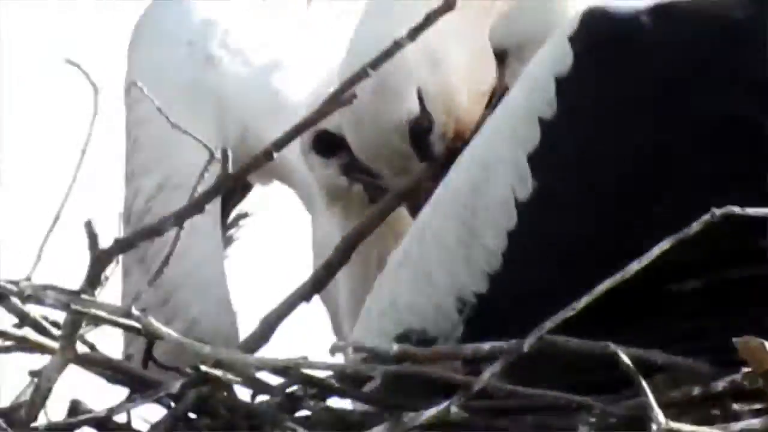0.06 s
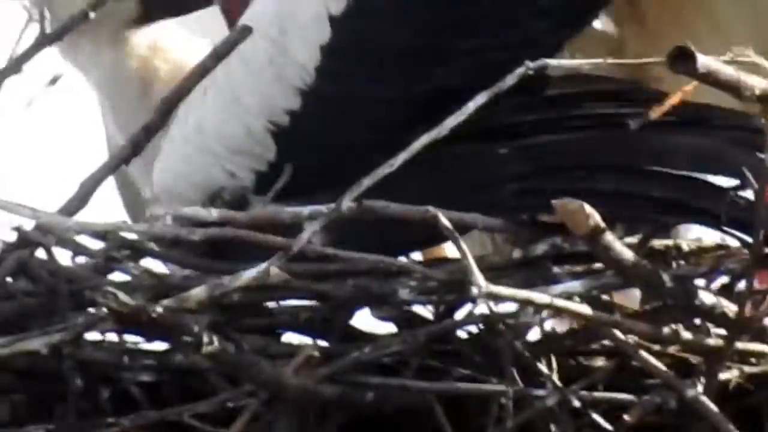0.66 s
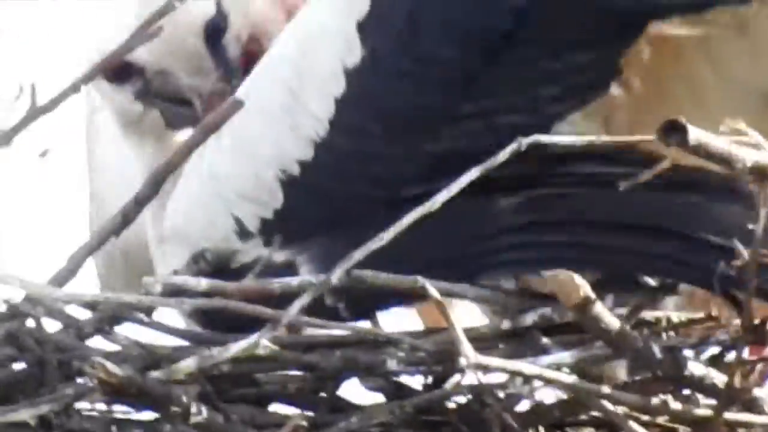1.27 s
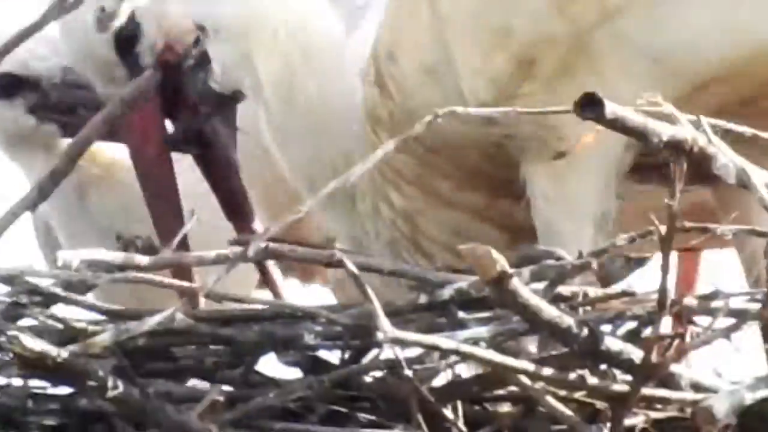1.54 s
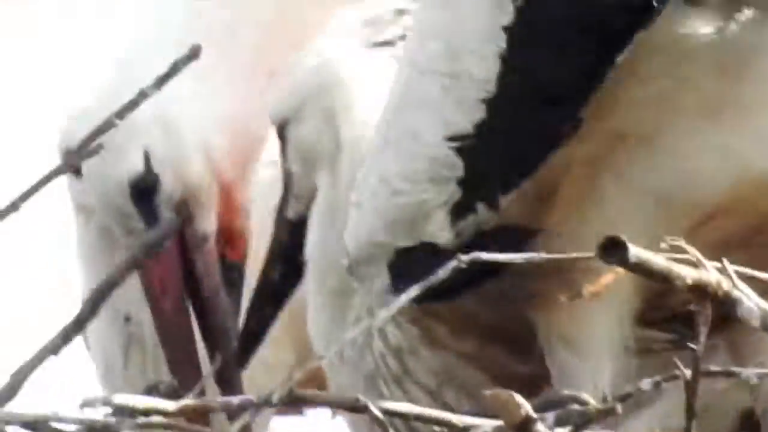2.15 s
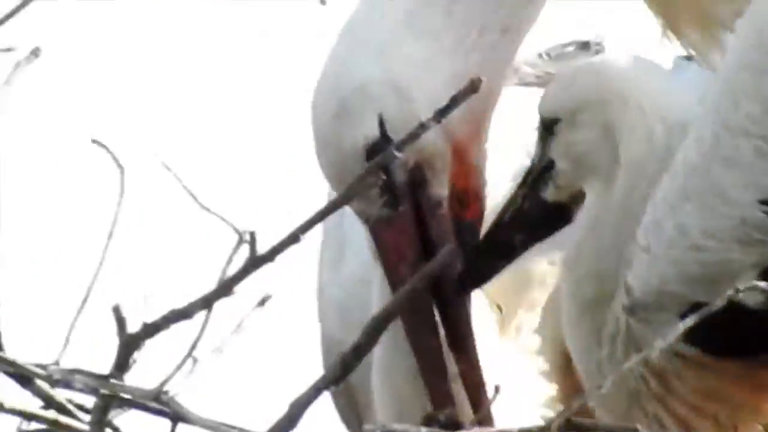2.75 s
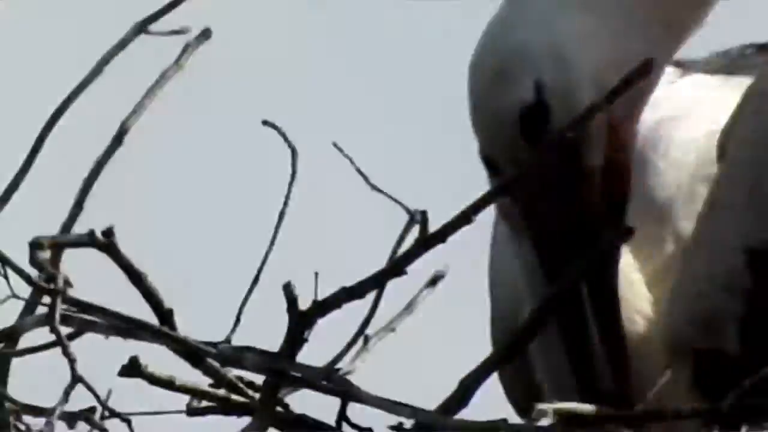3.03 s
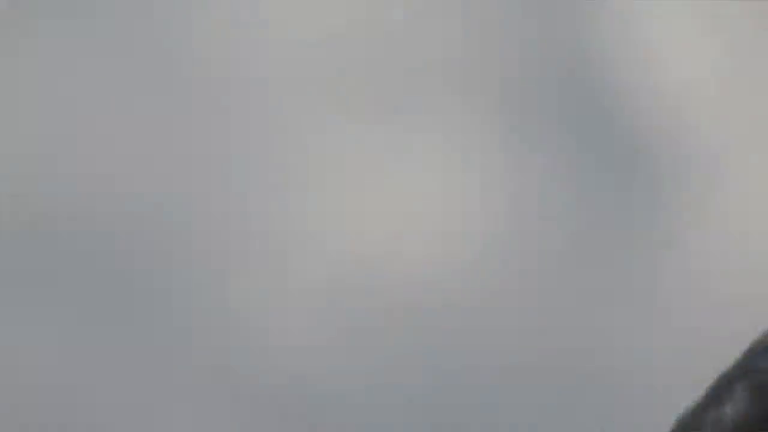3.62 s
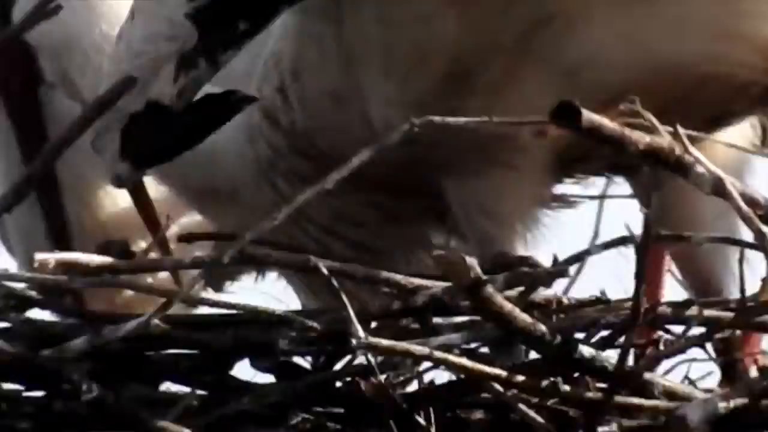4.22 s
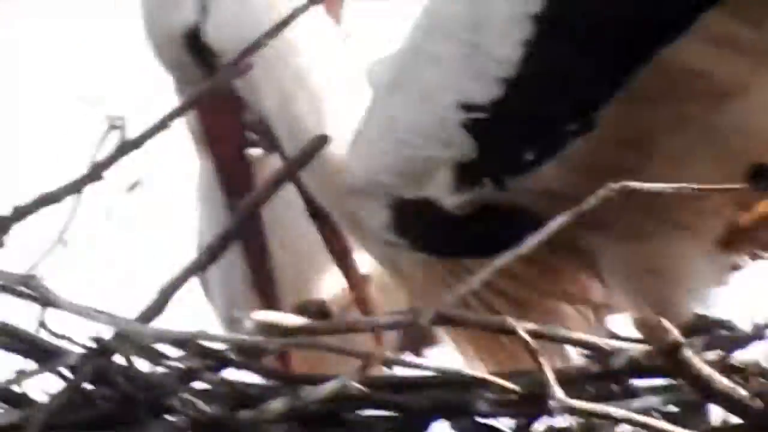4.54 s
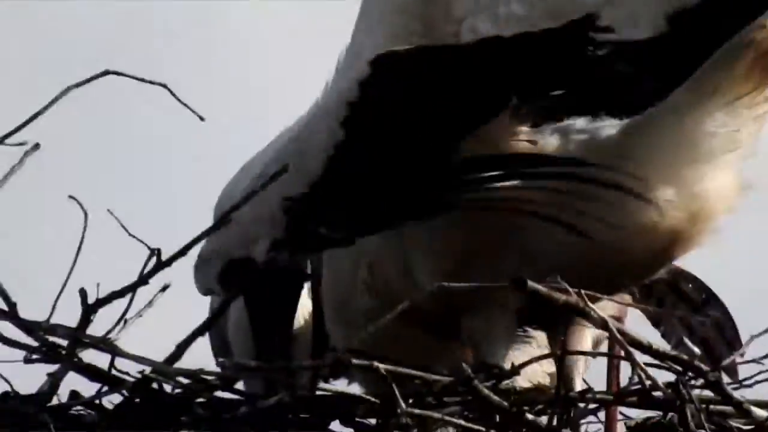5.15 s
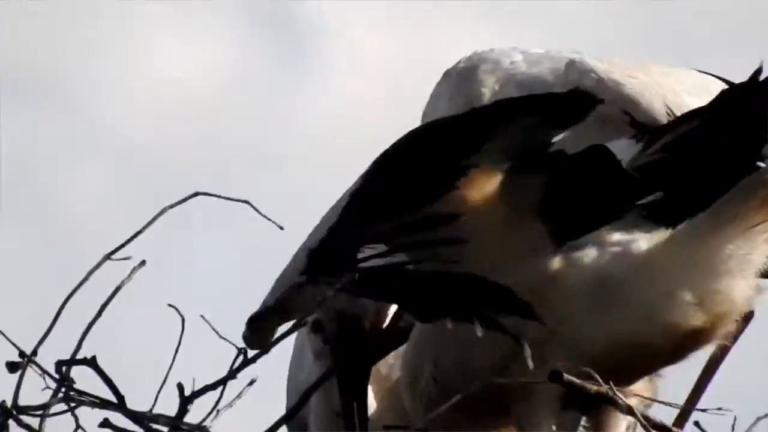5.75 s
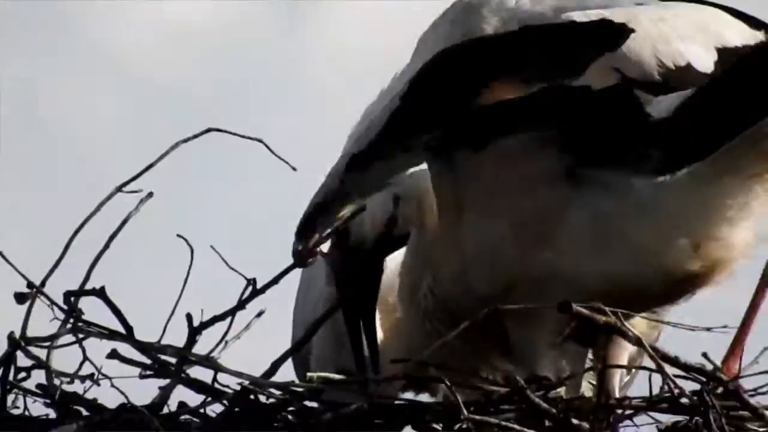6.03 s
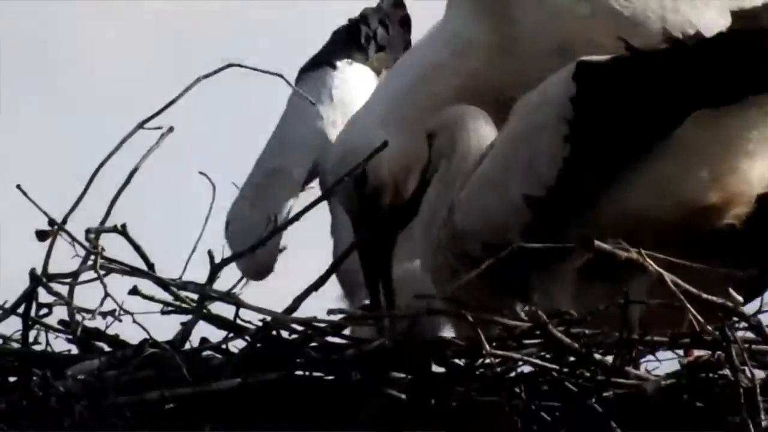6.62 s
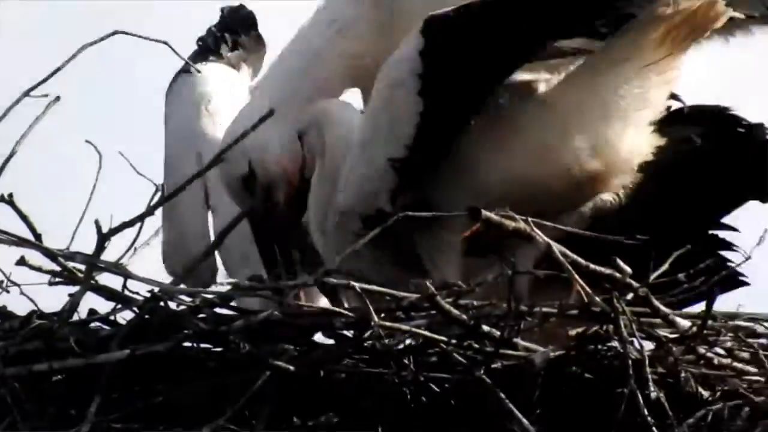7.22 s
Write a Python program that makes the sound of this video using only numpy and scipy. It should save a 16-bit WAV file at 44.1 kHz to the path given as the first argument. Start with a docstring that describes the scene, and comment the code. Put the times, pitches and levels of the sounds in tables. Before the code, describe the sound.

Outdoors, wind rumbles and bumps irregularly on the microphone over a low distant drone and a high, steady hiss. A small bird repeats a faint falling whistle about once a second throughout. Three thin, high pips sound between 0.5 and 0.9 seconds. At 0.9 seconds comes a loud wooden thud with a rebound, a hollow rattle and a rustle of nest twigs. A softer thud at 2.3 seconds brings another rustle and a brief hoarse squeal. A few dry stick knocks follow from about 4.5 seconds, ending with a sharp snap at 5.4. At 6 seconds a cow begins one moo, climbing in a thin high voice, cracking at 6.3 and dropping into a loud, steady, brassy bellow. It sits slightly left with a short yard echo, turns raspy near 7 seconds and carries on to the end, around 7.3 seconds.

```python
"""Outdoors, wind bumps the microphone over a low distant drone, faint far sounds and a high steady hiss.
A bird repeats a falling whistle throughout, and three thin pips sound early on. Two thuds with rustling
tails follow, the second with a hoarse squeal, then a few dry wooden knocks. Last, a cow moos once: its
vocal folds climb in a thin high register, crack, and drop into a long brassy bellow shaped by throat
and jaw."""
import sys
import numpy as np
from scipy import signal
from scipy.fft import rfft, irfft, next_fast_len
from scipy.io import wavfile
from scipy.ndimage import map_coordinates

SR = 44100
rng = np.random.default_rng(int(sys.argv[2]) if len(sys.argv) > 2 else 0)


def dump(signal):
    """Clip the signal to [-1, 1] and save it as 16-bit WAV at the path in sys.argv[1]."""
    limited = np.clip(np.atleast_2d(signal).T, -1, 1)
    pcm = np.round(limited * 32767).astype(np.int16)
    wavfile.write(sys.argv[1], SR, pcm)


N = 321048
TIME = np.arange(N) / SR


def amp(db):
    """Decibels to gain."""
    return 10 ** (np.asarray(db) / 20)


def unit_rms(x):
    """Scales to rms 1."""
    return x / np.sqrt(np.mean(x ** 2) + 1e-20)


def at_hz(points, hz):
    """A frequency curve read at these frequencies."""
    f, value = np.transpose(points)
    return np.interp(np.log(hz + 1), np.log(f + 1), value)


def curves(rows, t=TIME):
    """Each column of an automation table at these times."""
    s, *columns = np.transpose(rows)
    return [np.interp(t, s, c) for c in columns]


def eq(x, points):
    """Filters by a curve in dB."""
    size = next_fast_len(x.shape[-1] + 4096)
    gain = amp(at_hz(points, np.fft.rfftfreq(size, 1 / SR)))
    return irfft(rfft(x, size) * gain, size)[..., :x.shape[-1]]


def drift(rate, t=TIME):
    """Smooth random modulation of about rms 1, with `rate` new values a second."""
    return map_coordinates(rng.standard_normal(4096), [t * rate], order=2, mode="wrap")


def pan(db):
    """Stereo gains with the left this many dB over the right."""
    gains = amp([[db / 2], [-db / 2]])
    return gains / gains.mean()


def add(mix, s, sound):
    """Mixes a sound in at s seconds."""
    part = mix[..., max(round(s * SR), 0):][..., :sound.shape[-1]]
    part += sound[..., :part.shape[-1]]


def envelope(start, db, attack, hold, fall_db_per_s):
    """A gain that rises, holds and dies away."""
    age = TIME - start
    rise = np.sin(np.clip(age / attack, 0, 1) * np.pi / 2) ** 2
    return rise * amp(db - fall_db_per_s * np.maximum(age - attack - hold, 0))


# Stereo image of diffuse sound. Each row: frequency in Hz, left-right correlation.
CORRELATION = [(30, 0.81), (80, 0.54), (150, 0.69), (300, 0.66), (1200, 0.78), (3000, 0.64), (5000, 0.11),
               (7000, -0.43), (14000, -0.075)]

def noise(tone):
    """Coloured stereo noise of rms 1, narrow in the lows and mids, wide on top."""
    a, b = rfft(rng.standard_normal((2, N)))
    hz = np.fft.rfftfreq(N, 1 / SR)
    alike = np.clip(at_hz(CORRELATION, hz), -1, 1)
    mid, side = a * np.sqrt(1 + alike), b * np.sqrt(1 - alike)
    return unit_rms(irfft(np.array([mid + side, mid - side]) * amp(at_hz(tone, hz)), N))


# The yard's reverb. Each row: frequency in Hz, seconds to fall 60 dB.
YARD_DECAY = [(200, .45), (1000, .55), (3000, .62), (8000, .4)]

def yard(x, width=0.61):
    """Scattered outdoor echoes, each band dying at its own speed."""
    mid, side = rng.standard_normal((2, SR)) * (rng.random((2, SR)) < 1500 / SR) * (TIME[:SR] > .012)
    hz, t, bands = signal.stft(np.array([mid + width * side, mid - width * side]), SR, nperseg=256)
    tail = signal.istft(bands * amp(-60 * t / at_hz(YARD_DECAY, hz)[:, None]), SR, nperseg=256)[1]
    return signal.fftconvolve(x[None], tail / np.linalg.norm(tail[0]), axes=1)[:, :N]


# Gusts. Each row: peak time in seconds, level in dB, half length in seconds, pan left in dB.
GUSTS = [(.05, -32.5, 0.31, -4.5), (1.0, -37.5, 0.65, -2), (1.807, -33.5, 0.13, -10),
         (2.334, -37, 0.13, -3.5), (4.69, -39, 0.12, -9), (5.15, -44, 0.37, -4), (6.46, -38.5, 0.29, -8)]
# Tone of the rumble. Each row: frequency in Hz, gain in dB.
RUMBLE_EQ = [(15, -44.5), (32, -14.5), (55, 1.5), (85, 3), (130, -6.5), (190, -9.5), (270, -33),
             (500, -63.5)]
# Bumps on the microphone. Each row: peak time in seconds, level in dB, pitch in Hz, pan left in dB.
BUMPS = [(0.038, -16, 117, -11), (0.129, -23.5, 149, 10), (.234, -19.5, 103, -16), (0.393, -20, 103, 17),
         (0.449, -26, 74, 8), (.6, -26.5, 108, 4), (0.637, -31.5, 70, 2), (1.069, -25, 94, -17),
         (1.232, -20, 71.4, -7), (1.319, -21, 70, -31), (1.393, -24, 82, 11), (1.72, -24.5, 81.5, -19.5),
         (1.79, -21, 72, -22), (1.861, -16.5, 93.5, -25), (2.275, -26.5, 114, -2), (2.305, -28, 89.5, -7),
         (4.694, -20, 89, -27), (5.046, -21.5, 106, -17), (6.449, -22, 72, -8), (6.628, -27, 85, -16),
         (6.938, -23.5, 90, -27)]

def wind(breeze_db=-47.5, bump_s=0.012, lump_db=2.5, ragged=0.33):
    """Lumpy rumble swells in gusts, and eddies shove the microphone for a cycle or two."""
    power = amp(breeze_db) ** 2
    for s, db, half, side_db in GUSTS:
        power = power + (amp(db) * pan(side_db)) ** 2 * np.exp(-((TIME - s) / half) ** 2)
    out = np.sqrt(power) * amp(lump_db * drift(14)) * noise(RUMBLE_EQ)
    t = TIME[:6000] - TIME[3000]
    for s, db, hz, side_db in BUMPS:
        turns = np.cumsum(hz * (1 + ragged * drift(130, t - t[0]))) / SR
        swell = amp(db) / np.cosh(t / bump_s * np.pi / 2)
        push = swell * np.sin(2 * np.pi * (turns - turns[len(t) // 2]))
        add(out, s + t[0], pan(side_db) * push[s + t >= 0])
    return out


# The drone's partials. Each row: pitch in Hz, level in dB before the fader.
DRONE_PARTIALS = [(81.5, -53), (123.5, -46), (166, -54.5)]
# Its fader, one swell and a retreat. Each row: time in seconds, gain in dB.
DRONE_FADER = [(2.7, -1), (3.4, 3), (4.2, 0), (5.8, -6.5)]

def drone(waver=0.01286, throb_db=2.0):
    """A distant hum whose partials each throb and waver."""
    hum = 0
    for hz, db in DRONE_PARTIALS:
        gain = amp(db + throb_db * drift(6.9))
        hum += gain * np.sin(2 * np.pi * np.cumsum(hz * (1 + waver * drift(6))) / SR)
    return np.sqrt(2) * amp(curves(DRONE_FADER)[0]) * hum


# Tone of the open air. Each row: frequency in Hz, gain in dB.
AIR_EQ = [(120, 7.5), (250, 3), (450, -2.5), (650, -3), (1000, -3), (1500, -9.5), (2200, -6), (3500, -8),
          (4800, -6), (6000, 2.5), (6900, 8.5), (8000, -3), (10500, -18), (15000, -33)]
# Its fader. Each row: time in seconds, level in dB.
AIR_FADER = [(0, -45), (1.7, -43.5), (2.1, -45.5), (5.3, -42), (5.9, -46)]

def air(shimmer_db=1.36):
    """A bed of outdoor air with a high shimmering hiss."""
    return amp(curves(AIR_FADER)[0] + shimmer_db * drift(110)) * noise(AIR_EQ)


# Faint far-off sounds. Each row: band centre in Hz, level in dB.
FAR_BANDS = [(650, -66.5), (1050, -71.5), (3350, -69)]

def far_sounds(swell_db=4, spread=1.3):
    """Narrow bands of noise, each swelling and fading on its own."""
    return sum(amp(db + swell_db * drift(7)) * noise([(hz / spread, -60), (hz, 0), (hz * spread, -60)])
               for hz, db in FAR_BANDS)


# Whistles with low endings. Each row: start of the fall in seconds, lead-in in seconds, top and end
# pitch in Hz, fall in seconds, relative level in dB, loudest point as a share of the fall, then the
# low note's pitch in Hz, relative level in dB, length and swell in seconds.
WHISTLES = [(0.049, 0.037, 2910, 2610, .1, -48.5, 0.38, 2250, -60, 0.22, .02),
            (1.341, 0.061, 3416, 2890, 0.135, -48, 0.55, 2260, -52, 0.38, 0.17),
            (2.444, .015, 3255, 2720, 0.124, -42.5, 0.47, 2290, -52, 0.17, 0.043),
            (3.806, .035, 3206, 2540, 0.11, -51.5, .05, 2190, -48.5, 0.37, 0.07),
            (5.182, 0.088, 2937, 2470, .13, -50, .2, 2260, -59, 0.035, .01),
            (5.906, 0.049, 3340, 2720, 0.12, -55, .55, 2200, -72, .05, 0.011)]
# The low note from a bird farther off. Each row: peak time in seconds, relative level in dB.
FAR_NOTES = [(3.15, -63), (3.45, -60)]
# Tones of one squeal. Each row: start and length in seconds, pitch in Hz, relative level in dB.
SQUEAL = [(2.252, 0.2, 3580, -38.5), (2.276, 0.18, 1806, -45), (2.341, 0.092, 7340, -36)]

def bird_notes(scoop_hz=128, drop_hz=179, sag_hz_per_s=400, breakup_hz_per_s=220, fade_db_per_s=40):
    """Yields times, pitch and level for each whistle, low ending, far note and squeal tone."""
    for s, lead, top_hz, end_hz, fall, db, loudest, low_hz, low_db, low_length, swell in WHISTLES:
        # scoop up to the top, hold, then bend down
        t = np.arange(-lead, fall, 1 / SR)
        fallen = np.maximum(t, 0) / fall
        hz = top_hz - scoop_hz * np.exp(-(t + lead) / .011) - (top_hz - end_hz) * fallen ** 1.25
        fade_in_db = 159 * np.minimum(t, 0)
        yield s + t, hz, db - 11 * (fallen - loudest) ** 2 + fade_in_db
        # the low note drops into its pitch, sags, and breaks up the longer it is held
        t = np.arange(0, low_length, 1 / SR)
        hz = low_hz + drop_hz * np.exp(-t / .012) + t * (breakup_hz_per_s * drift(110, t) - sag_hz_per_s)
        yield s + fall + .012 + t, hz, low_db - fade_db_per_s * abs(t - swell)
    for s, db in FAR_NOTES:
        t = np.arange(-.12, .12, 1 / SR)
        yield s + t, 2180 - sag_hz_per_s * t, db - fade_db_per_s * abs(t)
    for s, length, hz, db in SQUEAL:
        t = np.arange(0, length, 1 / SR)
        yield s + t, hz - 320 * np.exp(-t / .014), db - 12 * t / length


def birds(wobble_hz=24, flutter_db=2.6, waver=0.0024, hoarse=.02, dry_db=-1, far_echo_db=-14):
    """Whistled notes that turn hoarse at both ends of their range and trail an echo."""
    out, send = np.zeros((2, N))
    for t, hz, db in bird_notes():
        hz, db = hz + wobble_hz * drift(35, t), db + flutter_db * drift(40, t)
        strain = np.interp(hz, [2250, 2700, 3420, 3550, 5000], [1, .06, .06, 1.9, 0])
        phase = 2 * np.pi * np.cumsum(hz * (1 + (waver + hoarse * strain) * drift(260, t))) / SR
        # louder is brighter; the lowest and highest notes get no octave
        brightness = amp(-2.5 + 2 * min(db.max() + 41, 0))
        octave = brightness * np.interp(hz, [2500, 2800, 3100, 3280], [0, 1.3, .9, 0])
        call = np.sqrt(2) * amp(db) * (np.sin(phase) + octave * np.sin(2 * phase))
        call *= signal.windows.tukey(len(t), .08)
        add(out, t[0], call)
        add(send, t[0], call * amp(-9 + 6 * np.minimum(strain, 1)))  # hoarse notes are wetter
    echo = yard(send)
    add(echo, .15, amp(far_echo_db) * yard(echo[0]))
    return amp(dry_db) * out + echo


# Thin high pips. Each row: peak time in seconds, peak level in dB.
PIPS = [(.524, -37.5), (.801, -40), (.845, -38.5)]

def pips(hz=6800, half_s=0.0038):
    """Tiny sine blips that stick out of the hiss."""
    gain = sum(amp(db) * np.exp(-((TIME - s) / half_s) ** 2) for s, db in PIPS)
    return gain * np.sin(2 * np.pi * hz * TIME)


# Hits on wood, the two thuds among them. Each row: start in seconds, clack, crunch, thump and snap
# levels in dB, snap delay in seconds, contact time in seconds, hollow ring level in dB.
KNOCKS = [(0.8701, -3, -39, -7.5, -48, .01, 0.0049, -36), (.917, -16.5, -38, -13, -46, .004, 0.0031, -40),
          (.944, -19, -48, -18.5, -60, .01, .004, -36), (1.0702, -7.5, -52, -48, -60, .01, 0.0058, -33),
          (1.097, -21, -49, -50, -60, .01, 0.0052, -45), (2.2574, -19.5, -40, -37, -52, .01, 0.0029, -56),
          (2.282, -35, -53, -37, -55, .01, 0.0044, -52), (4.086, -38, -47, -51, -70, .01, 0.0029, -55),
          (4.533, -39, -45, -24.5, -51, .011, 0.00088, -40),
          (4.604, -49, -46, -21.5, -52, .011, 0.001, -39), (4.697, -28, -45, -19.5, -34, 0.01, 0.0016, -31),
          (4.983, -32.5, -34, -20.5, -35, .011, 0.00068, -32),
          (5.0435, -20, -39, -14, -31.5, 0.0093, 0.0025, -26),
          (5.3255, -25.5, -41, -25, -29.5, 0.01, 0.0012, -32), (5.352, -28, -39, -22, -52, .01, 0.001, -38),
          (5.3608, -12, -35, -23.5, -13.5, 0.0085, 0.0019, -35)]
# The wood's modes. Each row: frequency in Hz, gain in dB, seconds to fall 60 dB.
WOOD_MODES = [(720, -13, 0.013), (844, -1.5, 0.038), (974, -2, 0.04), (1174, -8, 0.033), (1450, -22, 0.022),
              (1940, -4.5, 0.016), (2285, -7, 0.028), (2950, -11.5, 0.036), (3500, -14, .03),
              (3850, -8, 0.029)]
# Tone of the crunch and of the snap. Each row: frequency in Hz, gain in dB.
CRUNCH_EQ = [(150, -16), (430, -9), (620, 6.5), (1000, 5.5), (1400, -3), (2300, -0.5), (3000, -13),
             (3800, -3.5), (4600, -24), (9000, -60)]
SNAP_EQ = [(2500, -21), (3600, -17), (4200, -8), (5200, -11), (6500, -2.5), (8500, -9), (10500, -20.5),
           (15000, -37)]

def knocks(thump_hz=208, thump_t60=0.11, hollow_hz=620, hollow_t60=0.065, snap_t60=0.024, wet_db=-23):
    """A crunch swells into each knock, which rings the wood, its hollow and its body; a snap follows."""
    t, out = TIME[:8000], np.zeros(N)
    lead = t[1300]
    crunch_shape = amp(-60 * np.maximum((lead - t) / .047, (t - lead) / .062))
    loudest_snap = max(row[4] for row in KNOCKS)
    for s, clack_db, crunch_db, thump_db, snap_db, delay, contact, hollow_db in KNOCKS:
        crunch = crunch_shape * unit_rms(eq(rng.standard_normal(len(t)), CRUNCH_EQ))
        add(out, s + .00304 - lead, amp(crunch_db) * crunch)
        clack = np.zeros(len(t))
        for k, (hz, db, t60) in enumerate(WOOD_MODES):
            detune = 1 + .018 * rng.standard_normal()
            # a long soft contact hardly stirs the high modes; neighbours swing opposite ways
            ring = amp(db - 2 * (hz * contact / 4) ** 2 - 60 * t / t60)
            clack -= (-1) ** k * ring * np.sin(2 * np.pi * hz * detune * t)
        hollow = amp(hollow_db - 60 * t / hollow_t60) * np.sin(2 * np.pi * hollow_hz * t)
        thump = (1 - np.exp(-t / .0093)) * amp(-60 * t / thump_t60) * np.sin(2 * np.pi * thump_hz * t)
        touch = 1 - np.exp(-(t / contact) ** 2)
        add(out, s, touch * (amp(clack_db) * clack + hollow) + amp(thump_db) * thump)
        dull_db_per_octave = .5 * (loudest_snap - snap_db)  # weaker snaps are duller
        tone = [(hz, db - dull_db_per_octave * max(np.log2(hz / 4200), 0)) for hz, db in SNAP_EQ]
        snap = unit_rms(eq(rng.standard_normal(len(t)), tone))
        add(out, s + delay, touch * amp(snap_db - 60 * t / snap_t60) * snap)
    return out + amp(wet_db) * yard(out)


# The first thud's boom and its tail. Each: level in dB, attack and hold in seconds, fall in dB a second.
BOOM = (-23.5, 0.0138, 0.0173, 380.5)
BOOM_TAIL = (-46, 0.08, 0.18, 77)
# Rattles after that thud and its rebound. Each row: start in seconds, level in dB, attack and hold in
# seconds, fall in dB a second.
RATTLES = [(0.864, -28.5, .008, 0.075, 128), (1.085, -35.5, .012, 0.014, 60)]
# Tone of the boom and of the rattle. Each row: frequency in Hz, gain in dB.
BOOM_EQ = [(80, -13), (150, 1), (230, -2), (330, 0.5), (430, -2.5), (540, -21), (800, -68)]
RATTLE_EQ = [(400, -21.5), (620, -8.5), (820, 0.5), (960, -4.5), (1100, -20), (1230, -13), (1370, -31),
             (1570, -16), (2000, -52), (3500, -62)]

def thud_tail(start=.868, grain_db=2.0):
    """The first thud dies away in a low boom and a grainy hollow rattle."""
    boom = (envelope(start, *BOOM) + envelope(start, *BOOM_TAIL)) * noise(BOOM_EQ)
    rattle = sum(envelope(*row) for row in RATTLES) * noise(RATTLE_EQ) * pan(1.6)
    return (boom + rattle) * amp(grain_db * drift(90))


# A rustle after each thud, then a faint one alone. Each row: start in seconds, level in dB, attack and
# hold in seconds, fall in dB a second.
RUSTLES = [(0.868, -33.5, 0.031, 0.065, 71.5), (2.256, -34.5, 0.038, 0.0083, 41.5),
           (3.36, -55, .06, .1, 60)]
# One tone curve per rustle. Each point: frequency in Hz, gain in dB.
RUSTLE_EQS = [
    [(900, -23), (1700, 2), (2100, -11), (2500, -2), (3600, -3), (5000, 0), (6600, 4), (8000, -5),
     (10000, -32), (13000, -47)],
    [(200, -9), (400, -1), (540, -5), (780, 1), (1020, 1.5), (1380, -2.5), (1830, 5), (2080, 0.5),
     (2400, 6), (3000, -2), (3650, 3), (4300, -0.5), (6000, 0.5), (6900, 5.5), (8500, -11), (11000, -42)],
    [(200, -4), (600, -6), (1400, 0), (2500, -7), (4000, 2), (6000, -12), (11000, -42)],
]

def rustles(grain_db=0.5):
    """Short washes of noise with a fine uneven grain."""
    return sum(envelope(*row) * amp(grain_db * drift(250)) * noise(tone)
               for row, tone in zip(RUSTLES, RUSTLE_EQS))


# Tone of the throat and of the hoarse breath in the rise. Each row: frequency in Hz, gain in dB.
THROAT_EQ = [(165, -1), (250, -21), (400, -2), (580, -10), (730, -17), (1000, 6.5), (1250, -10.5),
             (1490, 3.5), (1800, -26.5), (2050, -18), (2300, -29.5), (2700, -11), (3150, -28),
             (3600, -15.5), (3950, -19), (4400, -36), (7000, -64)]
BREATH_EQ = [(1900, -24.5), (2350, -19), (2700, 0), (3200, -12), (3600, -2.5), (4000, 2), (4500, -8.5),
             (6000, -27), (10000, -59)]

def moo_rise(start=5.98, crack=6.333, end=6.37, low_hz=120.75, high_hz=221.5, build_s=.19,
             soft_db=-56.5, effort_db=36, flutter_db=3.0, hum_db=-42.5, breath_db=-48.5):
    """Pitch and level climb with effort in the folds' high register, until the voice cracks and drops."""
    t = np.arange(start, end, 1 / SR)
    effort = 1 - np.exp(-(t - start) / build_s)
    cracked = .5 + .5 * np.tanh((t - crack) / .009)
    hz = (1 - cracked) * (low_hz + (high_hz - low_hz) * effort) + cracked * BELLOW_PITCH[0][1]
    db = soft_db + effort_db * effort - 398 * np.maximum(t - crack, 0)
    turns = np.cumsum(hz * (1 + .0035 * drift(120, t))) / SR
    folds = sum(np.cos(2 * np.pi * k * turns + k * k / 7) for k in range(1, 36))
    puffs = (.54 + np.exp(-(turns % 1) / .3)) * rng.standard_normal(N)[:len(t)]
    # rough at the weak start and around the crack, clear between
    rough = np.clip(.05 + .35 * (1 - effort) ** 5 + .72 * np.exp(-((t - crack) / .034) ** 2), 0, 1)
    voice = (1 - rough) * unit_rms(eq(folds, THROAT_EQ)) + rough * unit_rms(eq(puffs, THROAT_EQ))
    voice *= amp(db + flutter_db * drift(25, t)) / np.hypot(rough, 1 - rough)
    # the fundamental and its octave hum through while the voice is still soft
    hum_gain = np.sqrt(2) * amp(hum_db) * np.exp(-((effort - .45) / .24) ** 2)
    hum = hum_gain * (np.cos(2 * np.pi * turns) + amp(-4) * np.cos(4 * np.pi * turns))
    breath = amp(breath_db) * np.exp(-((t - 6.195) / .062) ** 2 / 2) * unit_rms(eq(puffs, BREATH_EQ))
    opening = 1 - np.exp(-(t - start) / .049)
    out = np.zeros(N)
    add(out, start, (opening * (voice + breath) + hum) * signal.windows.tukey(len(t), .08))
    return out


# Resonances of throat and mouth, low to high, moving with the jaw.
# Each row: time in seconds, centre in Hz, relative level in dB.
CHEST = [(6.36, 317, -28), (6.424, 361, -26), (6.663, 347.4, -25.5), (7.006, 337, -25), (7.28, 408, -26.5)]
MAIN_RING = [(6.36, 1024, -22), (6.426, 1017, -22), (6.52, 1054, -15.5), (6.647, 1058, -20),
             (6.70, 1010, -14), (6.8, 1016, -16), (6.885, 1035, -23), (6.99, 1032, -22.5),
             (7.03, 966, -18.5), (7.11, 1035, -20), (7.155, 999, -22), (7.2, 1010, -19.5),
             (7.28, 1022, -19.5)]
UPPER_RING = [(6.36, 1484, -31), (6.526, 1500, -24.5), (6.57, 1460, -28.5), (6.65, 1496, -24),
              (6.716, 1527, -25.5), (6.828, 1480, -29.5), (6.963, 1509, -26.5), (7.06, 1467, -33.5),
              (7.1, 1410, -24), (7.134, 1375, -31), (7.17, 1360, -31.5), (7.28, 1335, -28)]
LOW_HONK = [(6.36, 1734, -36), (6.47, 1750, -38.5), (6.53, 1740, -31), (6.608, 1860, -35),
            (6.707, 1750, -37), (6.796, 1920, -37), (6.959, 1840, -38), (7.009, 1930, -28.5),
            (7.054, 1870, -48.5), (7.2, 1895, -36), (7.28, 1890, -40)]
HIGH_HONK = [(6.36, 2190, -49), (6.42, 2150, -36.5), (6.5, 2160, -35.5), (6.56, 2070, -38.5),
             (6.63, 2094, -32), (6.7, 2140, -33.5), (6.81, 2250, -44), (6.93, 2230, -38),
             (6.996, 2190, -33.5), (7.042, 2190, -42), (7.13, 2320, -40), (7.22, 2050, -51)]
BRASS = [(6.36, 2780, -39.5), (6.43, 2790, -41), (6.511, 2610, -37.5), (6.6, 2580, -40.5),
         (6.68, 2630, -33.5), (6.78, 2653, -28.5), (6.9, 2626, -30), (6.985, 2760, -34.5),
         (7.035, 2620, -27.5), (7.07, 2690, -36.5), (7.1, 2740, -33.5), (7.22, 2630, -37),
         (7.28, 2680, -35.5)]
HIGH_BRASS = [(6.36, 3250, -43), (6.44, 3060, -38.5), (6.5, 3050, -46), (6.59, 3180, -38),
              (6.683, 3420, -46), (6.82, 3250, -59), (6.96, 3150, -42), (7.05, 3330, -47.5),
              (7.1, 3320, -37), (7.16, 3360, -44), (7.28, 3200, -39)]
LOW_EDGE = [(6.36, 3520, -34), (6.533, 3550, -39), (6.589, 3630, -35.5), (6.734, 3630, -34),
            (6.93, 3615, -29.5), (7.05, 3680, -33.5), (7.09, 3620, -38), (7.13, 3690, -38.5),
            (7.28, 3550, -38)]
MID_EDGE = [(6.36, 3920, -43.5), (6.5, 4050, -40), (6.603, 3990, -33.5), (6.664, 4100, -35.5),
            (6.726, 4080, -31), (6.97, 4090, -33), (7.06, 4060, -36), (7.09, 4050, -34), (7.135, 4060, -32),
            (7.17, 4070, -41), (7.28, 4110, -36)]
HIGH_EDGE = [(6.36, 4387, -53.5), (6.59, 4450, -43.5), (6.645, 4480, -49.5), (6.72, 4440, -39),
             (6.9, 4510, -38.5), (7.05, 4450, -39.5), (7.085, 4470, -36.5), (7.14, 4440, -41.5),
             (7.28, 4510, -41)]
# The formant bank. Each row: one resonance above, half width in Hz.
FORMANTS = [(CHEST, 209), (MAIN_RING, 171.5), (UPPER_RING, 136), (LOW_HONK, 190), (HIGH_HONK, 170),
            (BRASS, 233), (HIGH_BRASS, 160), (LOW_EDGE, 156), (MID_EDGE, 165), (HIGH_EDGE, 150)]
# The buzz above the formants. Each row: frequency in Hz, gain in dB.
BUZZ_EQ = [(4750, -34.5), (5000, -26.5), (5350, -59), (5780, -34), (6100, -41.5), (6450, -29.5),
           (6730, -26), (7000, -70.5), (7430, -45), (8100, -49), (9500, -61.5)]

def throat_gains(t, pitch, valley_db=-70.5, buzz_from_hz=4600, buzz_db=-19, flutter_db=2.36):
    """Each harmonic's gain over time through steep-sided resonances, with a buzz swelling in on top."""
    hz = np.arange(1, 68)[:, None] * pitch
    buzz = amp(buzz_db + at_hz(BUZZ_EQ, hz)) * (1 - np.exp(-(t - t[0]) / .11))
    power = np.where(hz > buzz_from_hz, buzz, amp(valley_db)) ** 2
    for track, width in FORMANTS:
        centre, db = curves(track, t)
        power += amp(db) ** 2 / (1 + ((hz - centre) / width) ** 2) ** 5
    # higher harmonics flutter more
    flutter = np.array([min(k / 10, 1) * drift(22, t) for k in range(len(hz))])
    return np.sqrt(power) * amp(flutter_db * flutter)


# The bellow's pitch. Each row: time in seconds, pitch in Hz.
BELLOW_PITCH = [(6.36, 140), (6.5, 141.7), (6.62, 142.7), (6.72, 143.5), (6.86, 143.2), (7.044, 142.5),
                (7.1, 140.9), (7.154, 139.6), (7.226, 138.4), (7.28, 137.6)]
# The voice settles, then roughens as it tires. Each row: time in seconds, roughness (0 is clear).
ROUGHNESS = [(6.36, .6), (6.5, 0.4), (6.7, 0), (6.88, 0.3), (7.04, 0.45), (7.11, 1.2), (7.17, 1.2),
             (7.28, 0.7)]
# Tone of the rasp. Each row: frequency in Hz, gain in dB.
RASP_EQ = [(200, 0.5), (600, -6), (1000, -2), (1500, -3.5), (2000, -2), (2700, -2.5), (3200, -8),
           (3900, -4.5), (4600, -8.5), (5400, -17), (6600, -11), (9000, -35), (12000, -66)]

def moo_bellow(start=6.325, attack_s=0.046, smear=.09, voice_db=1.01, rasp_db=-57):
    """Steady fold pulses ring the throat and mouth; shake and rasp grow with roughness."""
    t = TIME[round(start * SR):]
    coarse = t[::128]  # control rate
    (hz,), (rough,) = curves(BELLOW_PITCH, t), curves(ROUGHNESS, t)
    shake = (.0004 + .0014 * rough) * drift(250, t)
    turns = np.cumsum(hz * (1 + .0006 * drift(70, t) + shake)) / SR
    gains = throat_gains(coarse, hz[::128])
    # the throat rings after each closure, so each harmonic's lag shifts with the resonances
    shape = np.log(gains)
    lags = -signal.hilbert(np.vstack([shape[:1], shape, shape[::-1]]), axis=0).imag[1:]
    stray = .03 + .31 * rough[::128]
    voice = 0
    for k, gain in enumerate(gains):
        # the treble trails within each cycle, and rough harmonics stray on their own
        lag = lags[k] - smear * k ** 2 + stray * min(k / 20, 1) * drift(90, coarse)
        phase = 2 * np.pi * (k + 1) * turns + np.interp(t, coarse, lag)
        voice += amp(voice_db) * np.interp(t, coarse, gain) * np.cos(phase)
    puffs = (.4 + np.exp(-(turns % 1) / .3)) * rng.standard_normal(N)[:len(t)]
    rasp = amp(rasp_db + 10 * rough) * unit_rms(eq(puffs, RASP_EQ))
    fade = np.clip((t - start) / attack_s, 0, 1) * signal.windows.tukey(len(t), .006)
    out = np.zeros(N)
    add(out, start, (voice + rasp) * fade)
    return out


# The moo's reverb send. Each row: frequency in Hz, gain in dB.
MOO_SEND = [(300, -22), (1000, -17), (1600, -12), (3000, -8.5), (6500, -6.5)]
# Its place in the stereo field. Each row: frequency in Hz, pan left in dB.
MOO_PAN = [(280, -0.5), (430, 1.5), (850, 5), (1000, 4.5), (1500, -3.5), (2600, 1), (4000, 1.5),
           (7000, 1.5)]

def cow():
    """Both registers echo in the yard, the rise wetter than the bellow, a little to the left."""
    rise, bellow = moo_rise(), moo_bellow()
    left, right = rise + bellow + yard(eq(2 * rise + bellow, MOO_SEND))
    return np.array([eq(left, [(hz, db / 2) for hz, db in MOO_PAN]),
                     eq(right, [(hz, -db / 2) for hz, db in MOO_PAN])])


def scene():
    """The cow, the knocks and the birds over the outdoor bed."""
    events = cow() + knocks() + thud_tail() + rustles() + birds() + pips()
    return events + far_sounds() + wind() + drone() + air()


def record(dry, cutoff_hz=15800):
    """A steep low-pass on the whole mix."""
    lowpass = signal.firwin(511, cutoff_hz, window=("kaiser", 9), fs=SR)
    return signal.oaconvolve(dry, lowpass[None], "same")


dry = scene()
out = record(dry)
dump(out)
```